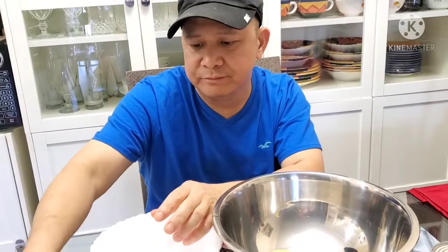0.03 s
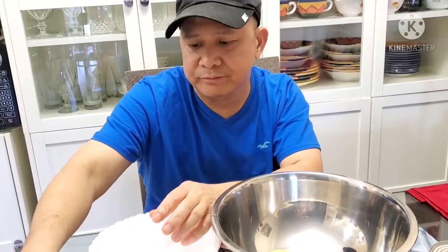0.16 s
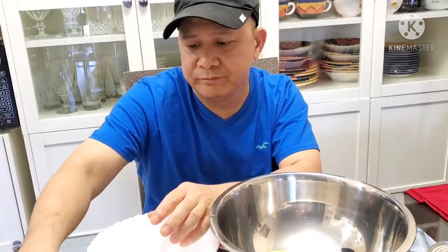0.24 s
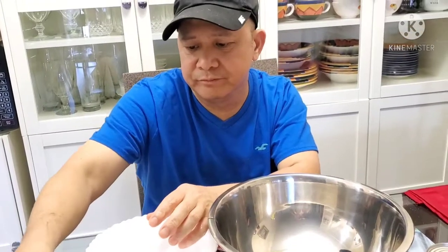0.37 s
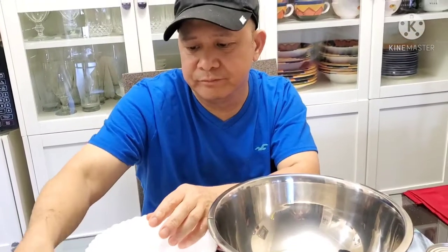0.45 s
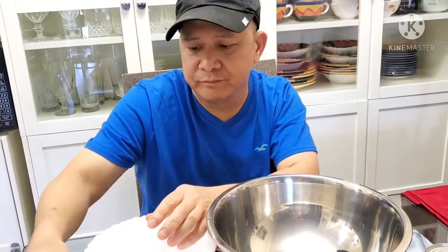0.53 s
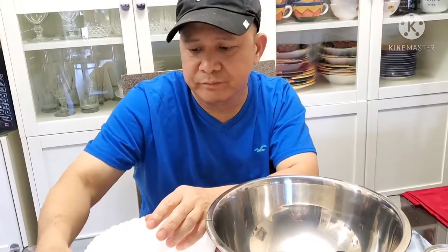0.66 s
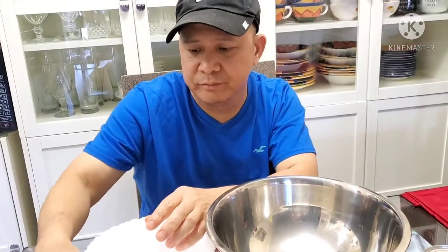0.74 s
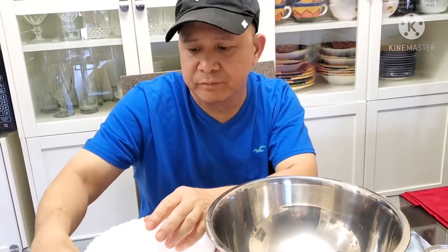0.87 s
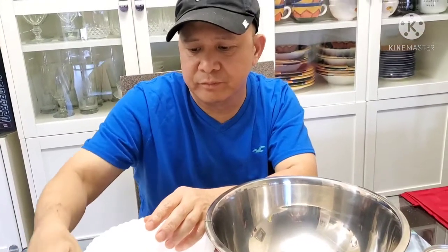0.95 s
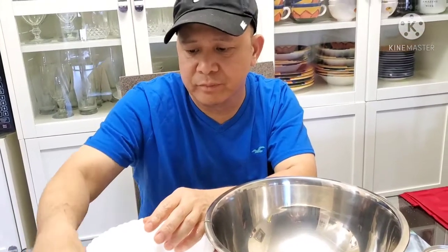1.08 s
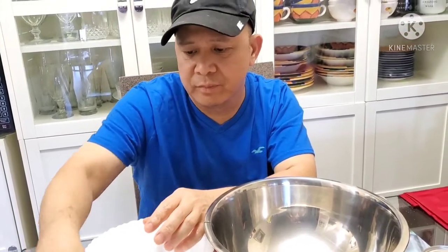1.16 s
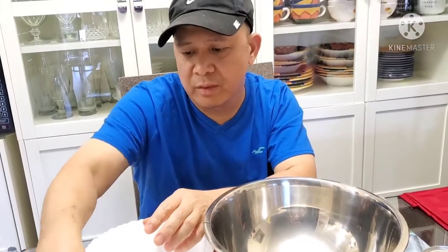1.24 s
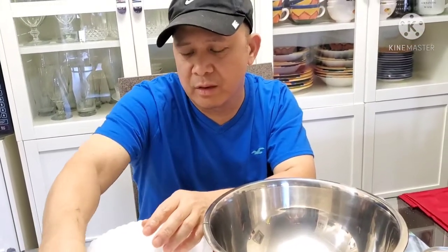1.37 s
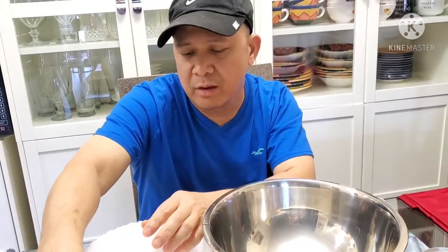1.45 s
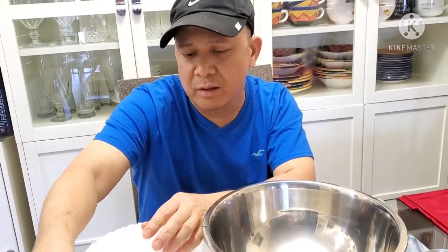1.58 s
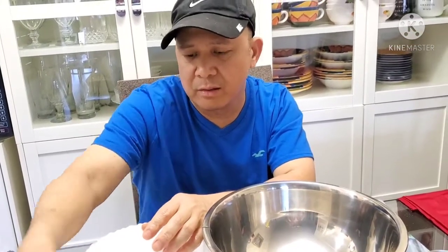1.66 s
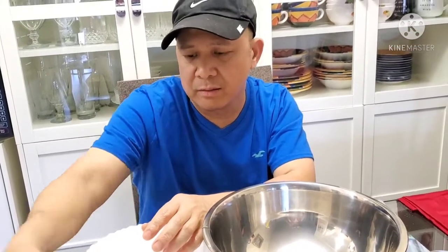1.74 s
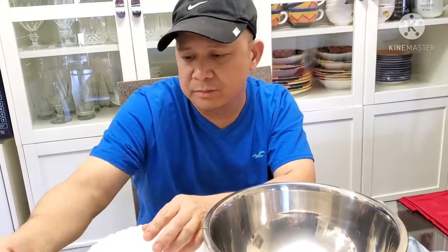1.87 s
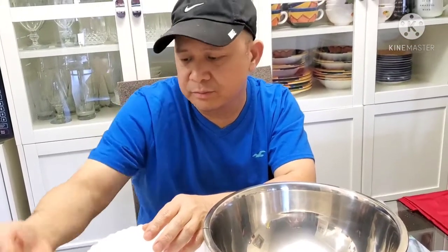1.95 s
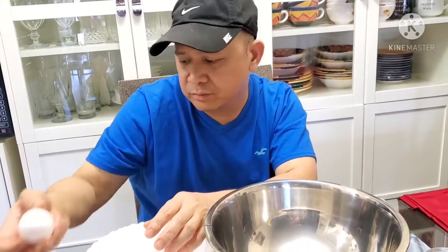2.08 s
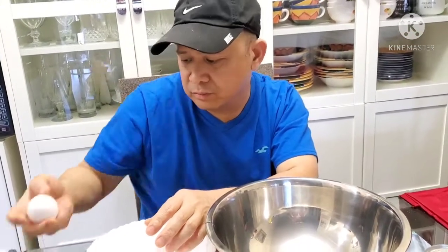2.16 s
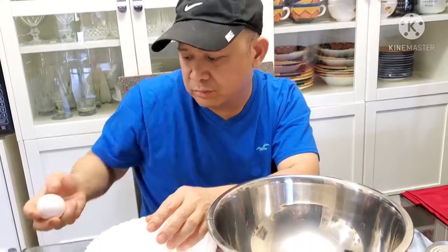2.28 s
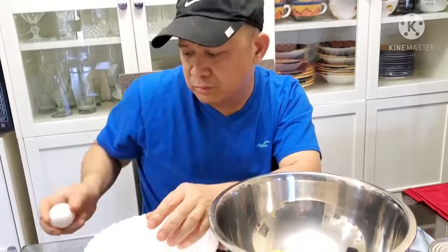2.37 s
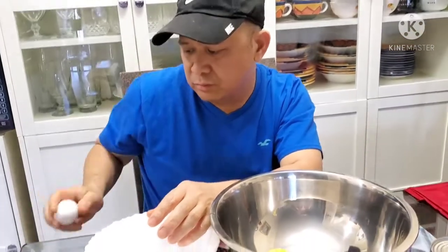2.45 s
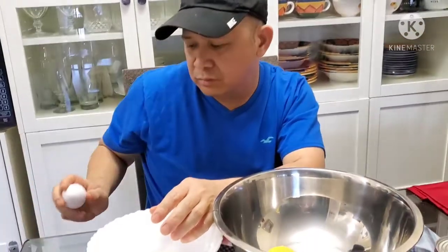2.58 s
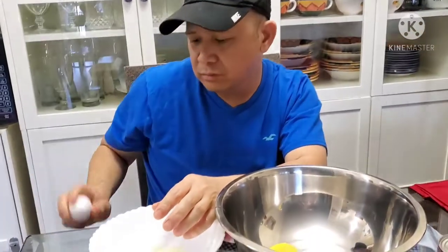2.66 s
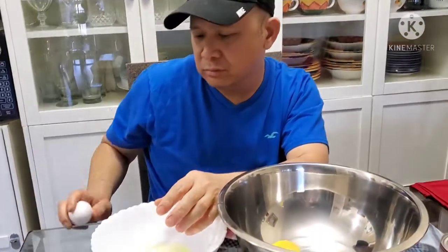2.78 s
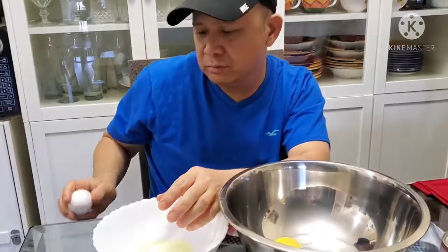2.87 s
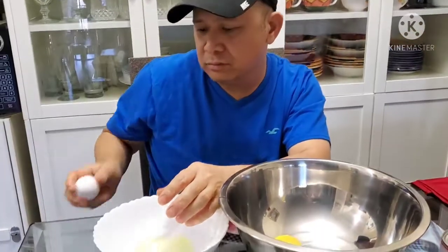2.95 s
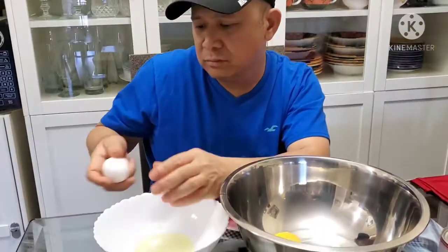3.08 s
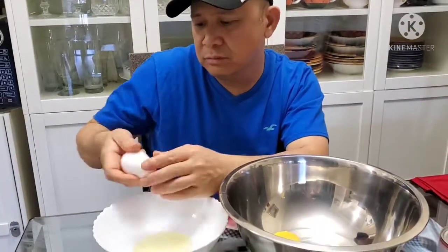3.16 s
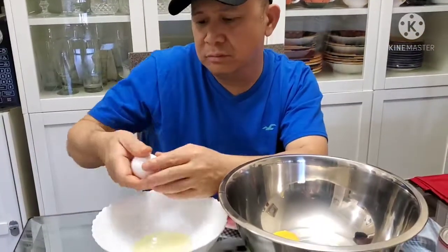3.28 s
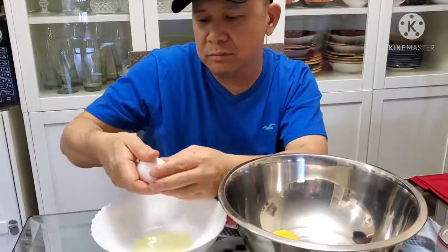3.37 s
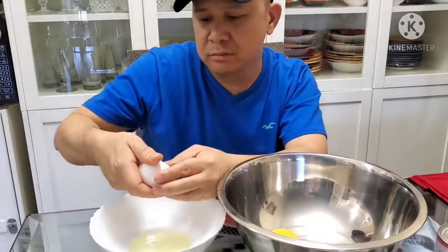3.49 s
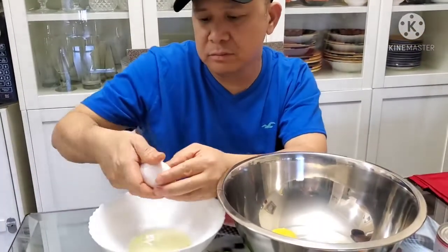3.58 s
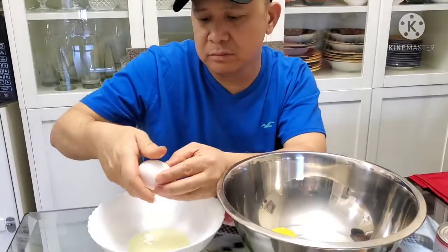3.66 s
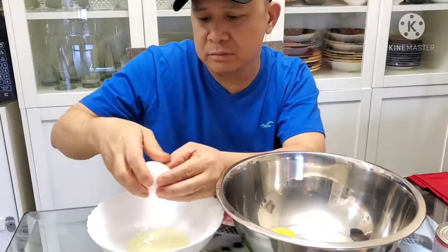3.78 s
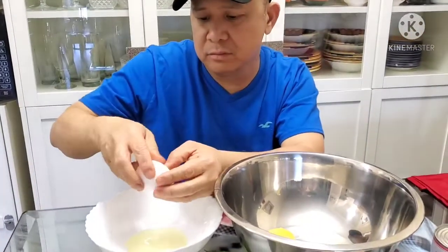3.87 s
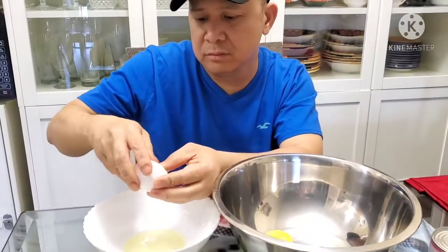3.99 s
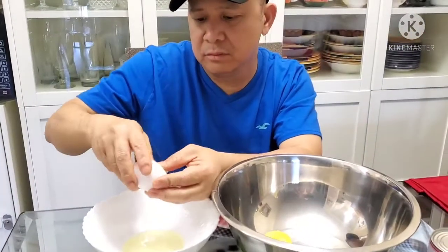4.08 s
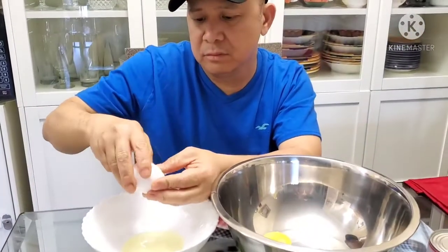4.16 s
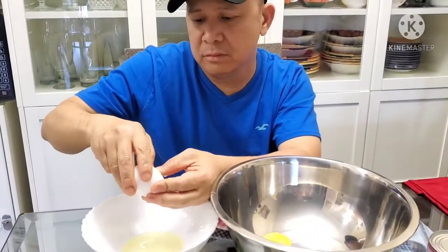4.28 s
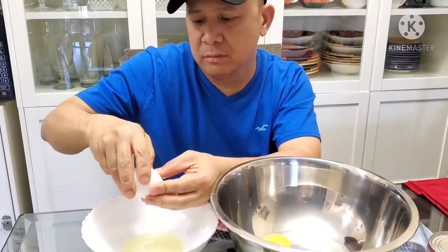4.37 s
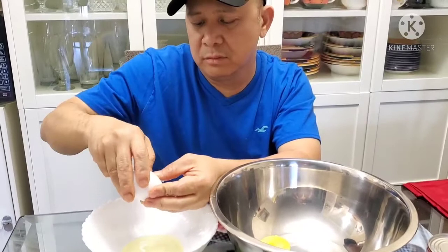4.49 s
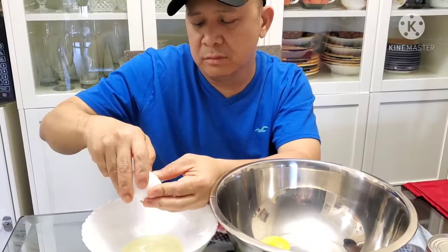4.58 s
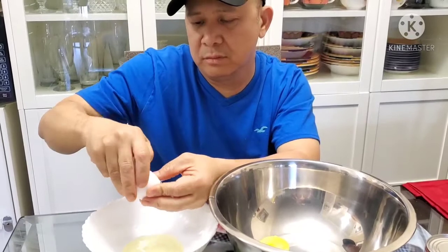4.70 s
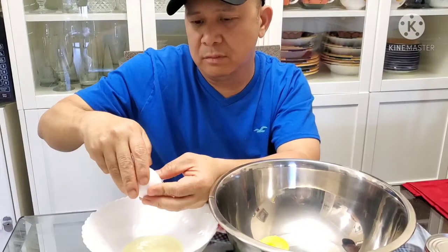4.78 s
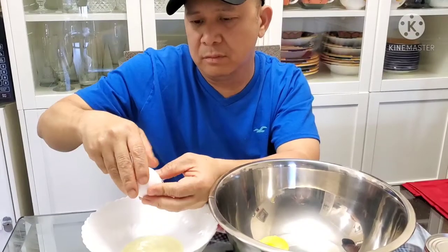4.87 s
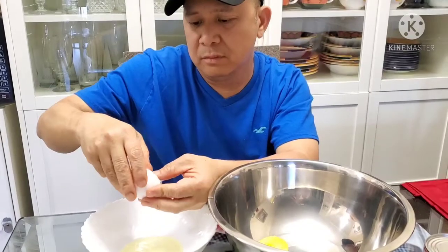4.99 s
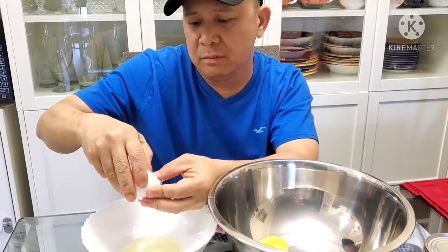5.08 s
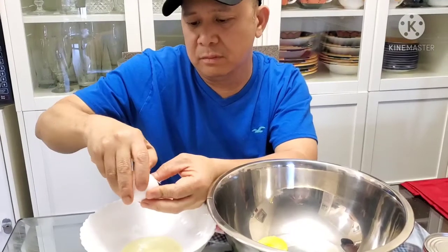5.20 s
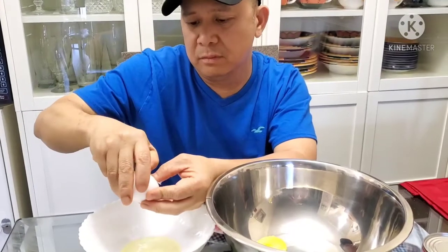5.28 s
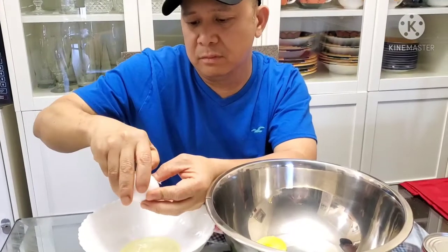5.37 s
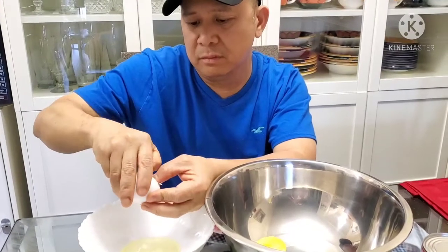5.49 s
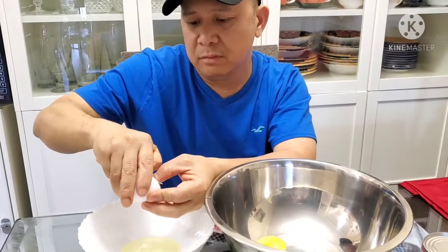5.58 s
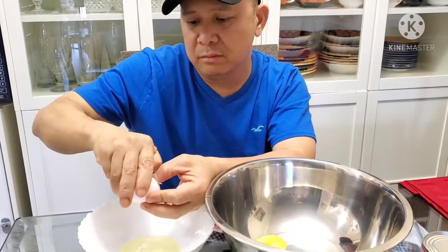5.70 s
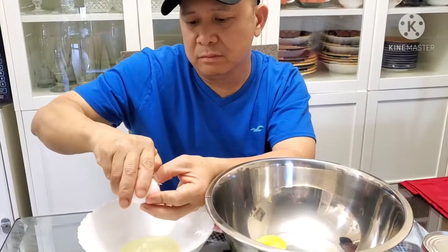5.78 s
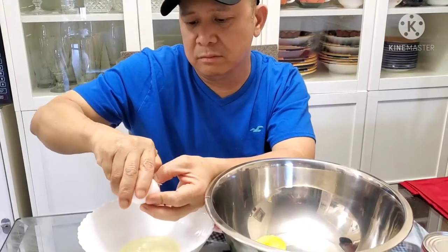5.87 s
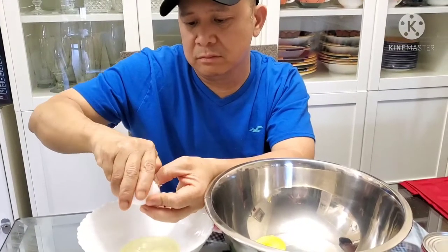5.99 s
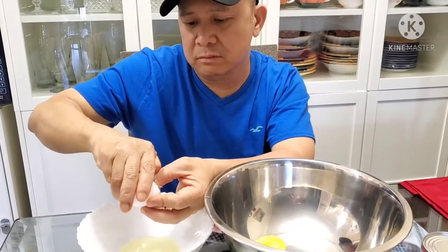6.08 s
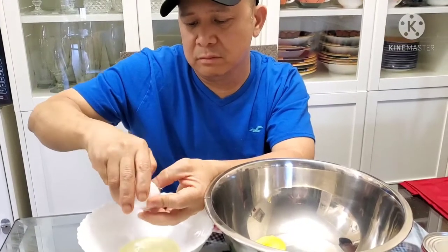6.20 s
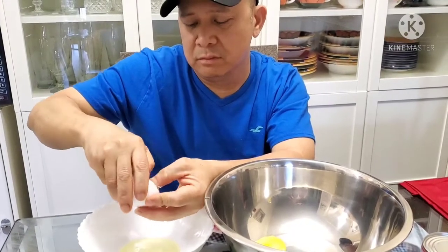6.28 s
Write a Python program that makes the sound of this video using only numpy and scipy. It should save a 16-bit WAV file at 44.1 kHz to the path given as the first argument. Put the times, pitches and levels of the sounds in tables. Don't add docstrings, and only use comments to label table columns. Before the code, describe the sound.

A reflective kitchen, picked up closely in stereo. A distant engine's low drone, around 53 hertz, and street rumble are strongest in the first two seconds and then fade, over quiet air and a faint refrigerator hum. From 0 to 1.7 s hands rub a pulp egg carton: dry scratches, rustle and hollow taps of eggs, busiest at 0.6-0.9. Sparrows outside give faint, echo-blurred double chirps near 5 kHz, about every 0.4 s at first, sparser later; another bird whistles downward at 0.5, 1.7, 2.35 and 3.25. At 2.72 an egg hits a bowl: very loud, sharp click with quick rebounds, shell crunch, short metallic ring and half-second room tail. Barely audible finger rustles follow, with crisp shell snaps at 4.63-4.7. A softer, rounder crack comes at 4.81, a small scuff at 6.0, and a very soft knock at 6.24, just before the end.

```python
import sys
import numpy as np
from scipy import signal
from scipy.fft import rfft, irfft, next_fast_len
from scipy.io import wavfile
from scipy.ndimage import uniform_filter1d, map_coordinates

SR = 44100
rng = np.random.default_rng(int(sys.argv[2]) if len(sys.argv) > 2 else 0)


def to_wav(sig):
    pcm = np.clip(np.atleast_2d(sig), -1, 1) * 32767
    pcm = np.round(pcm).astype(np.int16)
    wavfile.write(sys.argv[1], SR, pcm.T)


def boost_factor(decibels):
    exponent = np.asarray(decibels, float) / 20
    return 10 ** exponent


N = 279594


def unit(x):
    return x / np.sqrt(np.mean(x ** 2) + 1e-20)


def along(points, hz):
    f, v = np.transpose(points)
    return np.interp(np.log(hz + 1), np.log(f + 1), v)


def curves(rows):
    s, *cols = np.transpose(rows)
    return [np.interp(np.arange(N) / SR, s, c) for c in cols]


def wobble(rate):
    knots = rng.standard_normal(int(N * rate / SR) + 4)
    return map_coordinates(knots, [np.arange(N) * rate / SR])


def filtered(x, response):
    m = next_fast_len(x.shape[-1] + 8192)
    return irfft(rfft(x, m) * response(np.fft.rfftfreq(m, 1 / SR)), m)[..., :x.shape[-1]]


def causal(spectrum):
    def response(hz):
        cep = irfft(np.log(np.maximum(boost_factor(along(spectrum, hz)), 1e-5)))
        half = len(cep) // 2
        folded = np.r_[cep[0], 2 * cep[1:half], np.zeros(len(cep) - half)]
        return np.exp(rfft(folded))
    return response


# (frequency [Hz], likeness [0-1])
LIKENESS = [(60, .97), (150, .92), (380, .6), (900, .12), (1500, 0), (15000, 0)]


def spread(pair):
    turn = lambda hz: np.arccos(np.clip(along(LIKENESS, hz), 0, 1)) / 2
    mid, side = filtered(pair, lambda hz: np.array([np.cos(turn(hz)), np.sin(turn(hz))]))
    return np.array([mid + side, mid - side])


def rush(spectrum, grit_db=0):
    grains_db = grit_db * np.minimum(rng.exponential(size=N), 5.5)
    raw = rng.standard_normal((2, N)) * boost_factor(grains_db)
    return unit(filtered(spread(raw), lambda hz: boost_factor(along(spectrum, hz))))


# (frequency [Hz], t60 [s])
ROOM_T60 = [(100, 0.34), (400, 0.36), (1000, 0.47), (2000, 0.49), (3500, 0.47), (6000, 0.44), (11000, 0.39)]


def kitchen(x, longer=1, rise=0.0023):
    hz, t, z = signal.stft(rng.standard_normal((2, SR * 3 // 5)), SR, nperseg=256)
    decay = boost_factor(-60 * t / (longer * along(ROOM_T60, hz)[:, None]))
    tail = signal.istft(z * decay, SR, nperseg=256)[1]
    tail = spread(tail * np.minimum(np.arange(tail.shape[1]) / (rise * SR), 1))
    return signal.fftconvolve(x[None], tail / np.linalg.norm(tail[0]), axes=1)


def add(track, s, sound):
    part = track[:, round(s * SR):][:, :sound.shape[1]]
    part += sound[:, :part.shape[1]]


# (time [s], firing rate or pitch of the line [Hz], level
# [dB])
ENGINE_PASS = [(0.0, 53.34, -46), (1.27, 53.4, -41.5), (2.31, 54.75, -53.5), (2.58, 54.4, -48),
               (2.72, 59.5, -51), (2.95, 57.95, -60), (3.11, 55.25, -51.5), (3.25, 51.55, -73),
               (3.41, 51.7, -55), (4.08, 50.4, -74), (4.38, 46.5, -57.5), (4.71, 45.4, -67),
               (4.84, 49.1, -66), (5.42, 49.05, -68), (5.65, 57.8, -65), (6.34, 64.6, -69.5)]
ORDERS_DB = (0, -22.5, -29)


def engine(firing_hz, engine_db, gone_db):
    flutter_db = (1 + 0.053 * gone_db) * wobble(11)
    phase = 2 * np.pi * np.cumsum(firing_hz) / SR
    tone = sum(boost_factor(db) * np.sin(k * phase) for k, db in enumerate(ORDERS_DB, 1))
    return boost_factor(engine_db - 1.5 + flutter_db) * np.sqrt(2) * tone


# (time [s], level [dB])
STREET_SWELLS = [(0, -1), (1.0, 0.5), (2.2, -3.5), (2.8, -3), (3.3, -7), (4.1, -5), (4.9, -3), (5.2, -5.5),
                 (6.34, -4)]
# (frequency [Hz], density [dB per Hz])
RUMBLE_SPECTRUM = [(15, -38.5), (25, -19), (40, -2.5), (60, 1.5), (90, -2), (120, -13.5), (200, -62)]
AIR_SPECTRUM = [(35, -27), (60, -9), (91, -19.5), (124, -10.5), (142, -18.5), (353, -24.5), (388, -28),
                (647, -27), (897, -37.5), (962, -38.5), (1030, -43), (2330, -48), (4590, -56),
                (9680, -57.5), (15800, -54.5)]


def street(gone_db):
    street_db, = curves(STREET_SWELLS)
    rumble_db = -61 - 0.44 * gone_db + 0.76 * street_db + 0.6 * wobble(7.46)
    air_db = -58.5 + street_db + 0.23 * wobble(8.2)
    return boost_factor(rumble_db) * rush(RUMBLE_SPECTRUM) + boost_factor(air_db) * rush(AIR_SPECTRUM)


# (frequency [Hz], level [dB])
HUM_PARTIALS = [(120.5, -74.5), (197, -79.5), (288, -77.5)]


def refrigerator():
    t, hum = np.arange(N) / SR, 0
    for hz, db in HUM_PARTIALS:
        level = boost_factor(db + .9 * wobble(4.1)) * np.sqrt(2)
        hum = hum + level * np.sin(2 * np.pi * hz * t + 0.25 * wobble(5.0))
    return hum


def background():
    nearest_db = -37.5
    firing_hz, engine_db = curves(ENGINE_PASS)
    gone_db = np.maximum(nearest_db - uniform_filter1d(engine_db, size=SR // 3), 0)
    mix = engine(firing_hz, engine_db, gone_db) + refrigerator() + street(gone_db)
    return mix * boost_factor([[-1.1], [.9]])


def strokes(rows, rise, fall):
    t, gains = np.arange(N) / SR, np.zeros((len(rows), N))
    for gain, (s, hold, db, *_) in zip(gains, rows):
        near = slice(max(round((s - .15) * SR), 0), round((s + hold + .5) * SR))
        late = t[near] - s
        gain[near] = boost_factor(db + rise * np.minimum(late, 0) - fall * np.maximum(late - hold, 0))
    return gains, *np.array(rows)[:, 3:].T


# (time [s], hold [s], scratch [dB], hollow body re scratch [dB], bright edge re scratch [dB])
CARTON_STROKES = [(0.0, 0.0035, -72, 0.5, 1), (.075, 0.05, -68, 3, 1), (.15, 0.021, -78, -6, 8),
                  (.26, 0.005, -66.5, 5, 0), (.34, 0.005, -75.5, 8, -2), (.618, 0.0043, -49, -4.5, -1),
                  (.645, 0.016, -63.5, -10, 6.5), (.70, 0.054, -59, -0.5, 3), (.80, 0.017, -54.5, 2, -2),
                  (.862, 0.0077, -64.5, -4, 1), (1.15, 0.0076, -60, -2, 0.5), (1.29, 0.044, -67, 3.5, 0),
                  (1.34, 0.011, -54.5, -27, 0.5), (1.575, 0.0063, -66, -21, -17),
                  (1.61, 0.027, -60, -7, -2)]
# (time [s], hold [s], dry rustle [dB], duller layers re rustle [dB])
FINGER_STROKES = [(2.13, 0.0064, -78, -4), (3.01, 0.091, -77.5, -1), (3.66, 0.043, -85, -9.5),
                  (3.72, 0.039, -80.5, -13), (3.8, 0.08, -85, -5.5), (4.116, 0.019, -82, 1.5),
                  (4.296, 0.01, -91, 9.5), (4.635, 0.0077, -65.5, -6), (4.692, 0.0049, -67, -3),
                  (4.72, .04, -93, 14.5), (5.172, 0.011, -79.5, -1), (5.72, 0.02, -89, 2.5),
                  (5.845, 0.021, -81, -9), (6.03, .2, -86.5, -8)]
# (frequency [Hz], density [dB per Hz])
PULP_SPECTRUM = [(260, -60), (450, -26), (631, -1), (684, -10.5), (884, -2), (1500, -12.5), (1950, -46),
                 (3300, -120)]
SCRATCH_SPECTRUM = [(900, -13), (1300, -11.5), (2000, -3), (2600, -8), (3400, -11), (6300, -20.5),
                    (7500, -28.5)]
DRY_SPECTRUM = [(3240, -60), (5500, 2), (6920, -16), (8260, 1), (10700, 5.5), (13800, -5.5), (14900, -1),
                (15800, -9.5)]


def rubbing():
    body = rush(PULP_SPECTRUM, grit_db=3.5)
    scratch = rush(SCRATCH_SPECTRUM, grit_db=3.2)
    rustle = rush(DRY_SPECTRUM, grit_db=2.8)
    rim = filtered(scratch, lambda hz: hz > 2770)
    carton, hollow_db, bright_db = strokes(CARTON_STROKES, rise=896, fall=196)
    fingers, dull_db = strokes(FINGER_STROKES, rise=3000, fall=222)
    out = body * (boost_factor(hollow_db) @ carton + boost_factor(dull_db - 4) @ fingers)
    out = out + scratch * (carton.sum(0) + boost_factor(dull_db) @ fingers)
    out = out + rustle * (boost_factor(-10.5 + 0.46 * hollow_db) @ carton + fingers.sum(0))
    out = out + rim * ((boost_factor(bright_db) - 1) @ carton)
    return out * boost_factor(1.1 * wobble(45) + 1.8 * wobble(150))


# (time [s], peak [dB], low ring [Hz], high ring [Hz], high ring level [dB])
EGG_TAPS = [(0.058, -41, 744, 1570, -4), (0.073, -35, 875, 1910, -31), (0.23, -42.5, 735, 2690, 4),
            (0.257, -37, 850, 2530, -8), (0.339, -37, 750, 1410, -38), (0.615, -28, 877, 1920, -24),
            (0.699, -32, 775, 2380, -20), (0.729, -37, 870, 2300, -12), (0.751, -42, 900, 1490, -2),
            (0.762, -44, 850, 2300, -6), (0.814, -39, 870, 2270, 3), (0.829, -45, 880, 1500, -8),
            (0.870, -34.5, 968, 1970, 0.5), (0.793, -32, 910, 2160, -2.5), (0.804, -38, 880, 2290, 5),
            (0.822, -41, 870, 2100, -8), (0.857, -27, 1007, 1630, -18), (0.867, -33.5, 966, 1640, 5),
            (0.895, -42, 940, 1430, -14), (1.137, -58, 625, 2120, -5), (1.159, -62, 850, 1810, -13),
            (1.254, -46, 885, 2080, 11.5), (1.306, -74, 621, 1750, -13), (1.339, -67, 762, 1840, -6),
            (1.403, -38.5, 603, 1780, 2.5), (1.533, -54, 705, 1820, 8), (1.556, -44, 787, 2000, -14),
            (1.565, -42, 783, 1980, -4), (1.579, -52, 800, 2300, 3), (1.608, -40, 590, 2370, 3),
            (1.622, -42, 684, 1700, -6), (1.636, -53, 690, 2470, 2), (1.659, -47, 900, 1990, -5)]


def taps(hits):
    t = np.arange(SR // 10) / SR
    for s, db, low_hz, high_hz, high_db in EGG_TAPS:
        low = np.sin(2 * np.pi * low_hz * t)
        high = boost_factor(high_db + 16.5 - 60 * t / 0.0089) * np.sin(2 * np.pi * high_hz * t)
        envelope = boost_factor(db - 14.0 - 60 * t / 0.053) * (1 - np.exp(-t / 0.0016))
        add(hits, s, (envelope * (low + high))[None])


# (time [s], peak [dB], body [dB])
SHELL_SNAPS = [(0.03, -61, -15), (0.0605, -57, -19), (0.3381, -64, -3), (0.35, -74, -15),
               (0.6155, -56, 26.5), (0.97, -66.5, 21), (0.796, -64, 18), (1.660, -63, 23.5), (1.2, -67, 25),
               (4.4, -72, -17), (4.6305, -61.5, -19.5), (4.636, -48.5, -22.5), (4.698, -53.5, -9),
               (4.7025, -49.5, -12), (4.6915, -44.5, -17), (3.7, -79, -5)]


def snaps(hits):
    t = np.arange(SR // 10) / SR
    for s, db, body_db in SHELL_SNAPS:
        burst = boost_factor(-60 * t / 0.012) * rng.standard_normal(len(t))
        crackle = filtered(burst, causal(DRY_SPECTRUM))
        body = boost_factor(body_db + 0.5) * filtered(burst, causal(SCRATCH_SPECTRUM))
        add(hits, s, boost_factor(db + 5.5) * (crackle + body)[None])


def note(rows, top_hz, rough):
    s, share, db = np.transpose(rows)
    t = np.arange(s[0], s[-1], 1 / SR)
    jitter = 1 + rough * uniform_filter1d(rng.standard_normal(len(t)), size=40)
    hz = top_hz * np.interp(t, s, share) * jitter
    return boost_factor(np.interp(t, s, db)) * np.sin(2 * np.pi * np.cumsum(hz) / SR)


# (time [s], centre [Hz], level [dB])
SLIDE = [(6.006, 2984, -60), (6.013, 2815, -55.5), (6.03, 2506, -52), (6.05, 2190, -61.5),
         (6.075, 1740, -64.5)]


def hands():
    out, hits = rubbing(), np.zeros((1, N))
    taps(hits)
    snaps(hits)
    add(out, SLIDE[0][0], boost_factor(3.0) * kitchen(note(SLIDE, 1.0, rough=0.83)))
    return out + hits + boost_factor(-4.0) * kitchen(hits[0])[:, :N]


# (time [s], first note [dB], second note [dB])
SPARROW_CHIRPS = [(0.115, -57.5, -59.5), (0.537, -59.5, -60), (0.896, -57.5, -55), (1.274, -55, -57.5),
                  (1.669, -57.5, -67), (2.464, -58.5, -61.5), (3.645, -60, -58.5), (4.066, -59.5, -59.5),
                  (4.574, -59.5, -61), (5.675, -59.5, -59), (6.023, -59.5, -58.5)]
FIRST_TOPS_HZ = [5080, 5070, 5270, 5060, 4980, 5110, 5030, 5000, 5000, 5170, 5080]
SECOND_TOPS_HZ = [5110, 5150, 5040, 5060, 4990, 5090, 5090, 5080, 5060, 5170, 4980]
# (time from its start [s], pitch [share of top], level [dB])
CHIRP_LEAD_IN = [(-.030, 1.11, -26), (-.018, 1.14, -17), (0, 1.17, -17), (.010, 1.2, -21)]
CHIRP_FIRST = [(0, .68, -10), (.004, .77, -2), (.009, .97, -4), (.013, 1.005, 0), (.026, 1, 0),
               (.031, .9, -4), (.04, .77, -2), (.048, .67, -12)]
CHIRP_SECOND = [(.099, .65, -12), (.103, .7, -2), (.11, .83, -1), (.114, .855, 0), (.123, .85, 0),
                (.13, .75, -1), (.138, .66, -10)]


def sparrows(out):
    lead_s = .009
    for (s, first_db, second_db), first_hz, second_hz in zip(SPARROW_CHIRPS, FIRST_TOPS_HZ, SECOND_TOPS_HZ):
        parts = ((CHIRP_LEAD_IN, first_hz, first_db - 4, .28),
                 (CHIRP_FIRST, first_hz, first_db, .13),
                 (CHIRP_SECOND, second_hz, second_db, .17))
        for rows, hz, db, rough in parts:
            echo = kitchen(note(rows, hz, rough), longer=1.5, rise=.022)
            add(out, s + rows[0][0] - lead_s, boost_factor(db + 9.5) * echo)


# (time [s], length [s], start pitch [Hz], end pitch [Hz], level [dB])
FALLING_WHISTLES = [(0.472, 0.15, 4150, 3150, -64), (1.714, 0.077, 4090, 2950, -63.5),
                    (2.351, 0.2, 4080, 3201, -68.5), (3.252, 0.17, 4127, 2966, -70.5)]


def whistles(out):
    for s, length, start_hz, end_hz, db in FALLING_WHISTLES:
        end = end_hz / start_hz
        rows = [(0, 1, -14), (0.15 * length, .94, -2),
                (.6 * length, (1 + end) / 2 - .05, 0), (length, end, -10)]
        add(out, s, boost_factor(db + 5) * kitchen(note(rows, start_hz, rough=.55), longer=0.75, rise=0.0088))


def birds():
    out = np.zeros((2, N))
    sparrows(out)
    whistles(out)
    return out


# (time after blow [s], left [dB], right [dB])
NEAR_ECHOES = [(0, -4.5, 4), (.0016, -10, -5.5), (.0027, -11, -7.5), (.0040, -9, -0.5), (.0063, -12.5, -1),
               (.0076, -11, -7), (.0087, -16, -5), (0.0115, -11.5, -11), (0.0123, -8.5, -7.5),
               (0.0145, -12, -9), (0.0155, -8, -11), (0.017, -9.5, -4), (0.0172, -9.5, -12),
               (.0210, -9, -12.5), (0.0223, -9.5, -8.5), (0.0246, -11, -6.5), (0.0269, -12, -10)]


def near_walls():
    walls = np.zeros((2, SR // 20))
    for late, *side_db in NEAR_ECHOES:
        walls[:, round(late * SR)] = boost_factor(side_db)
    return walls


# (frequency [Hz], level [dB], t60 [s])
BOWL_MODES = [
    [(116, -14.5, 0.47), (62, -13.5, 0.18), (755, -9.5, 0.33), (865, -5.5, 0.5), (1038, -5, 0.35),
     (1072, -2, 0.36), (1372, 8.5, 0.062), (1507, -4, 0.3), (1748, -6, 0.52), (1750, -13.5, 0.71),
     (1850, -16.5, 0.31), (1945, -19, 0.4), (2160, -11.5, 0.31), (2530, -11.5, 0.29), (573, -16.5, 0.32),
     (1242.3, -9.5, 0.16), (1410, -14, 0.37), (3360, -22.5, 0.2), (3630, -1, 0.043)],
    [(133.8, -6, 0.49), (251.4, -6.5, 0.74), (583, -3.5, 0.3), (830, 2, 0.29), (1071, -5.5, 0.53),
     (1279, 1.5, 0.39), (1535, -3.5, 0.41), (1764, 8.5, 0.19), (2160, -6.5, 0.45), (2516, 4, 0.15),
     (2970, -3, 0.21), (3270, -13, 0.25)],
    [(247, 0.5, 0.27), (565, -18, 0.24), (810, -35, 3.3), (1130, -20, 4.6), (1282, 8, 0.1), (1695, 7, 0.18),
     (2970, -7, 1.1)],
]


def bowl_ring(modes):
    t, ring = np.arange(SR // 2) / SR, 0
    for hz, db, t60 in modes:
        decay = boost_factor(db - 60 * t / min(t60, .8) + rng.normal(0, 1, (2, 1)))
        turns = hz * t + rng.random((2, 1)) * min(hz / 1500, 1)
        ring = ring + decay * np.sin(2 * np.pi * turns)
    return ring * (1 - np.exp(-(t / .002) ** 2))


# (frequency [Hz], gain [dB])
SHELL_TINT = [(300, -14.5), (1000, -15), (2500, -6), (3700, 7), (5000, -1), (7000, -16), (11000, 7.5),
              (14000, 2.5)]


def breaking_shell(click):
    burst = spread(rng.standard_normal((2, 440))) * np.hanning(480)[20:460] ** .3
    return signal.fftconvolve(filtered(click, causal(SHELL_TINT))[None], burst, axes=1)


# (frequency [Hz], density [dB per Hz])
TICK_SPECTRUM = [(2500, -40), (3800, -3.5), (6000, 0), (8000, -6.5), (11000, -13.5), (16000, -30.5)]


def shell_tick(walls):
    t = np.arange(SR // 20) / SR
    return filtered(walls * boost_factor(-60 * t / .008), causal(TICK_SPECTRUM))


# (time [s], peak [dB])
EGG_KNOCKS = [
    (2.7168, -0.5),
    (4.8063, -14.5),
    (6.2424, -28.5),
]
# (frequency [Hz], density [dB per Hz])
CLICK_SPECTRA = [
    [(29, -52), (55, -22.5), (130, -8.5), (165, -20.5), (280, -17), (420, -18.5), (650, -24), (739, -7.5),
     (950, -9.5), (1060, -3.5), (1200, -8), (2050, -8), (3750, -15), (4240, -26), (15000, -45),
     (16500, -68)],
    [(59, -83), (100, -29), (249, -4), (365, -10.5), (570, -0.5), (648, -11), (818, 2.5), (910, 0.5),
     (1720, -1.5), (2200, -3), (2750, -8), (3300, -9.5), (3800, -18), (4670, -36.5), (13200, -43),
     (16000, -72)],
    [(88, -61), (150, -26), (251, -15), (308, -15.5), (581, -1.5), (643, -15), (818, -1.5), (1600, -6.5),
     (1740, -2.5), (4310, -21), (9000, -77.5), (11700, -99), (19800, -120)],
]
# (time after blow [s], level [dB])
LANDINGS = [
    [(.0042, -7), (.008, -3.5), (.0142, -10.5), (.02, -13)],
    [(.0042, -13)],
    [(.0042, -30)],
]
TICK_DB = (-30.5, -8, -45)
# (frequency [Hz], gain
# [dB])
TAIL_TINT = [(1500, 2.5), (2500, -3), (3700, -4), (4400, -1), (10000, 2), (14000, 4.5)]
# (frequency [Hz], left re right [dB])
KNOCK_BALANCE = [(60, -2.5), (150, -1.5), (380, -1.5), (700, -2), (1200, -2.5), (2380, -7), (5000, 4),
                 (9000, -2), (13500, 7)]


def knocks():
    out, walls = np.zeros((2, N)), near_walls()
    impulse = np.zeros(SR // 10)
    impulse[0] = 1
    ring_dbs, break_dbs, near_dbs = (-20, -22, -24), (-21, -25, -26), (0, -3, -3)
    per_knock = zip(EGG_KNOCKS, LANDINGS, TICK_DB, CLICK_SPECTRA, BOWL_MODES, ring_dbs, break_dbs, near_dbs)
    for (s, db), landings, tick_db, spectrum, modes, ring_db, break_db, near_db in per_knock:
        click = filtered(impulse, causal(spectrum))
        click = click / np.abs(click).max()
        ring = bowl_ring(modes)
        first = -boost_factor(db - 7.0) * signal.fftconvolve(click[None], walls, axes=1)
        add(out, s, first)
        for again_s, again_db in landings:
            add(out, s + again_s, boost_factor(again_db) * first)
        add(out, s, boost_factor(db + ring_db) * ring)
        add(out, s, boost_factor(db + tick_db) * shell_tick(walls))
        add(out, s, boost_factor(db + break_db) * breaking_shell(click))
        add(out, s, boost_factor(db + near_db) * kitchen(click, longer=0.26, rise=0.008))
        add(out, s, boost_factor(db + 3) * kitchen(filtered(click, causal(TAIL_TINT)), rise=0.014))
        add(out, s, boost_factor(db + ring_db - 6.5) * kitchen(ring[0], rise=0.00585))
    halves = np.array([[.5], [-.5]])
    return filtered(out, lambda hz: boost_factor(along(KNOCK_BALANCE, hz) * halves))


# (time after blow [s], gain [dB])
TAIL_SETTLE = [(0, 1), (0.039, -1), (.19, 0.5), (.25, 0), (.5, -0.5)]


def settling():
    late = np.arange(N) / SR - np.array(EGG_KNOCKS)[:, :1]
    since_s = np.where(late > 0, late, 1).min(0)
    return boost_factor(np.interp(since_s, *np.transpose(TAIL_SETTLE)))


def scene():
    rest = filtered(background() + hands() + birds(), lambda hz: hz < 15480)
    return knocks() * settling() + rest


def top_cut(x):
    return signal.sosfilt(signal.butter(12, 16660, fs=SR, output="sos"), x)


def record(dry):
    lag_s = np.array([[0], [.0002]])
    heard = filtered(dry, lambda hz: np.exp(-2j * np.pi * hz * lag_s))
    heard = heard / (1 + np.abs(heard / .93) ** 6) ** (1 / 6)
    return top_cut(heard)


dry = scene()
out = record(dry)
to_wav(out)
```